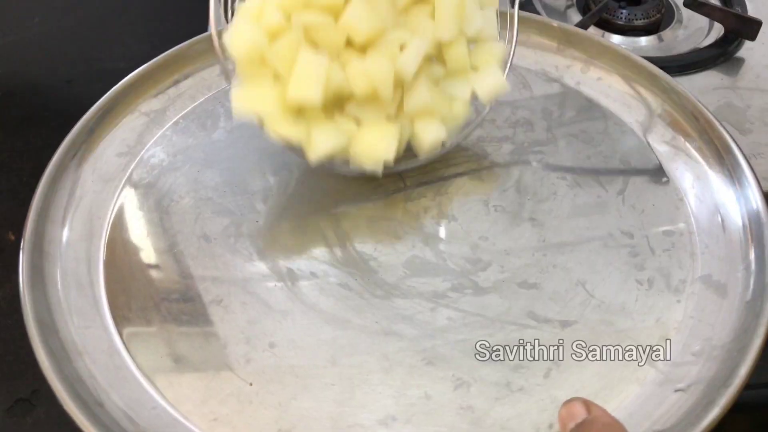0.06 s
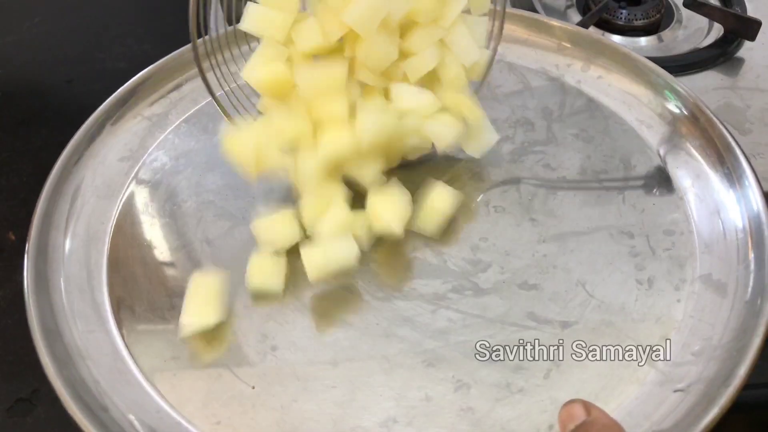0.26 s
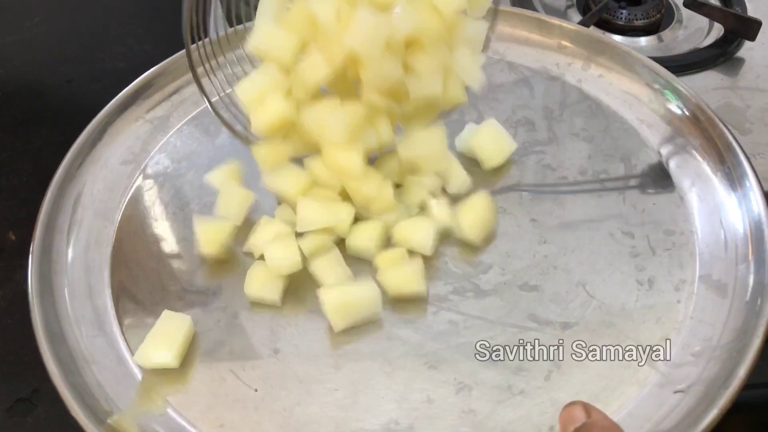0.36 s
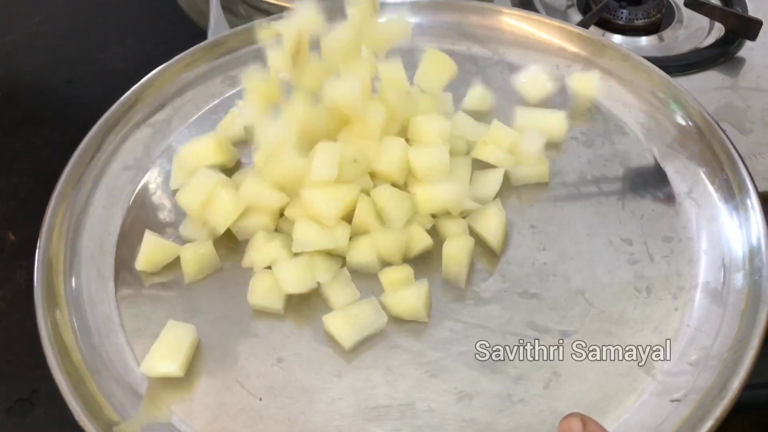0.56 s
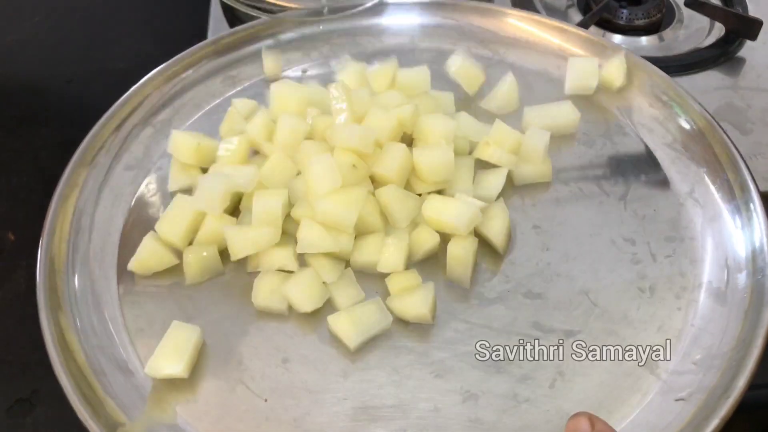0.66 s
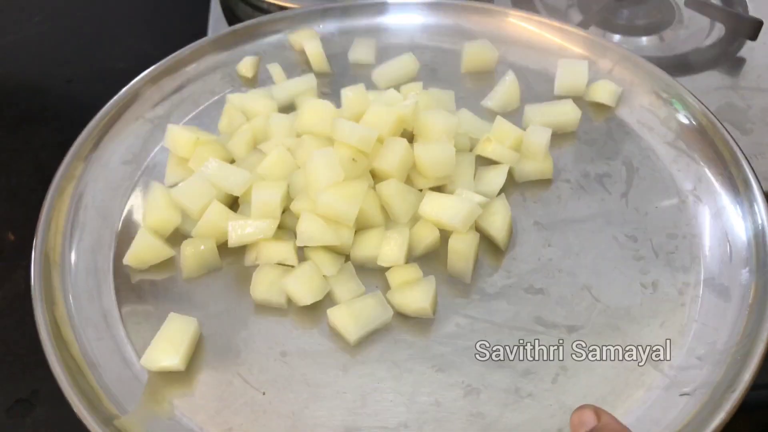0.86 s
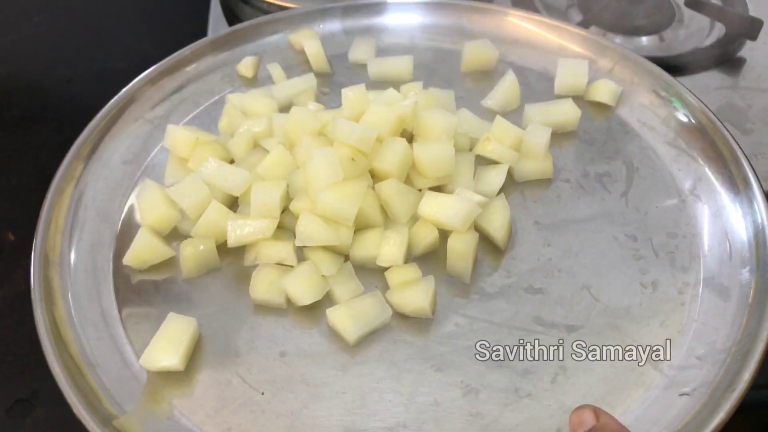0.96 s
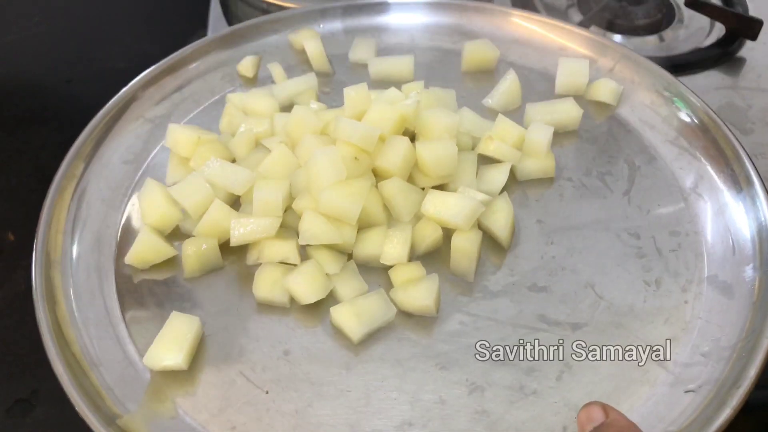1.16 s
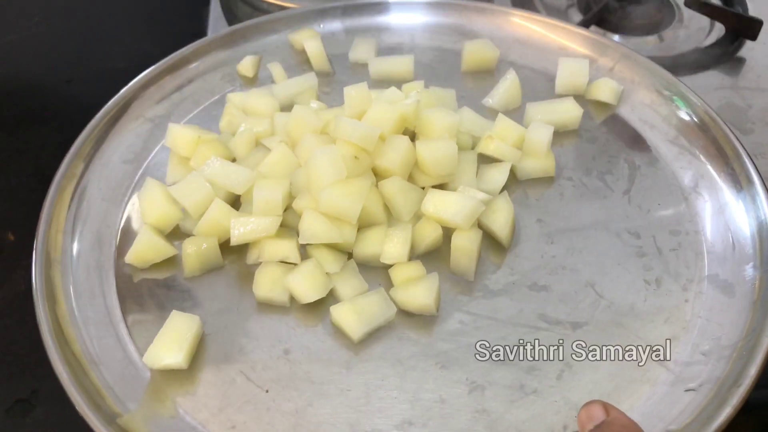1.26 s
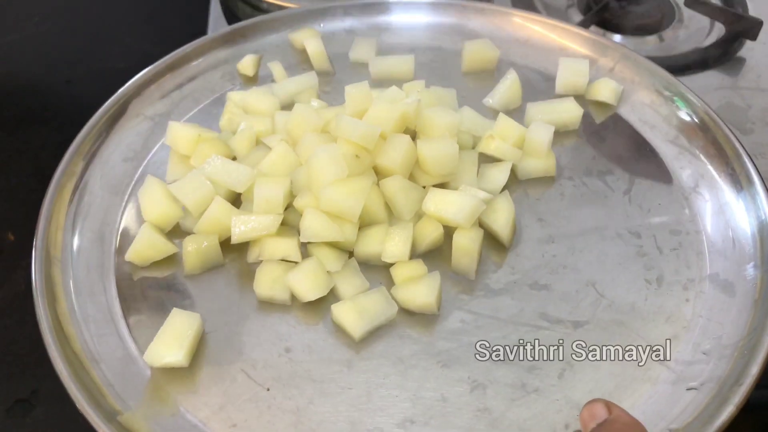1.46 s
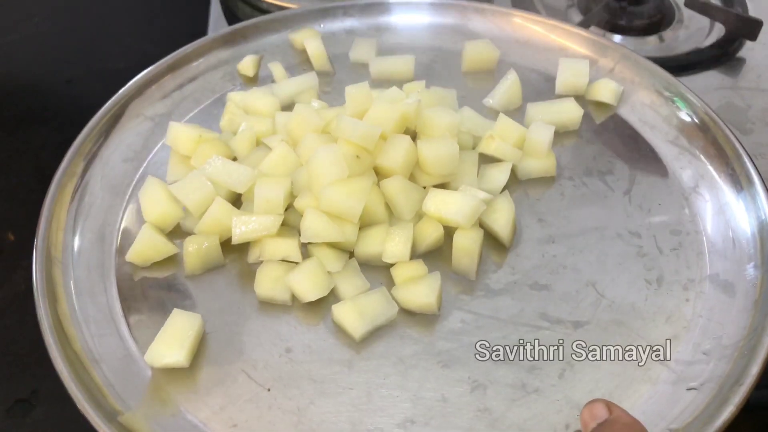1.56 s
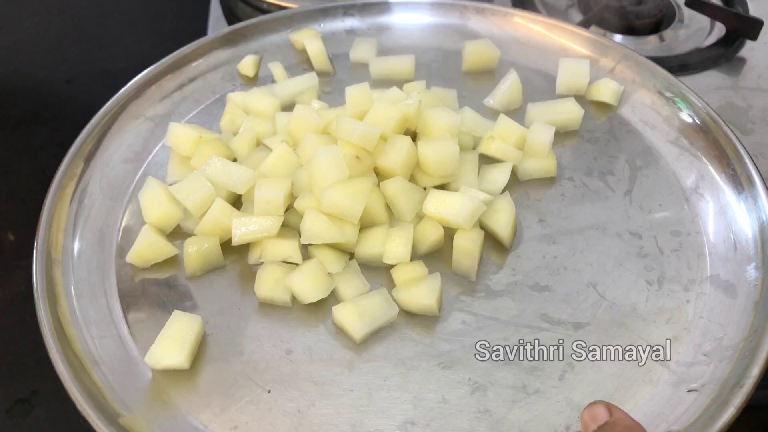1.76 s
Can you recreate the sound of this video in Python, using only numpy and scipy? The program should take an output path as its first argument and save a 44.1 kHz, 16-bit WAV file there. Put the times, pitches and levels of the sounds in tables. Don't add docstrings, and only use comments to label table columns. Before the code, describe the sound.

Close up in a quiet kitchen, soft cubes drum and tumble across a ringing metal plate and thin out, followed by a strainer clinking and dragging on a pot rim, ending in a tiny tick.

```python
import sys
import numpy as np
from scipy import signal
from scipy.fft import rfft, irfft
from scipy.io import wavfile

SR = 44100
rng = np.random.default_rng(int(sys.argv[2]) if len(sys.argv) > 2 else 0)


def materialize(psi):
    bounded = np.clip(np.atleast_2d(psi).T, -1, 1)
    quanta = np.round(bounded * 32767).astype(np.int16)
    wavfile.write(sys.argv[1], SR, quanta)


def volts_from_db(level):
    exponent = np.asarray(level, float) / 20
    return 10 ** exponent


N = 79380
RING = 13230


def shade(table, hz):
    log_hz, db = np.log(np.array(table)[:, 0]), np.array(table)[:, 1]
    return np.interp(np.log(hz), log_hz, db)


def curve(table, edge_s):
    t, rows = np.arange(N) / SR, np.array(table)
    inside_s = np.minimum(t - rows[0, 0], rows[-1, 0] - t)
    return volts_from_db(np.interp(t, rows[:, 0], rows[:, 1])) * np.clip(inside_s / edge_s + 1, 0, 1)


def unit(x):
    return x / np.sqrt(np.mean(x ** 2))


def unit_energy(x):
    return x / np.sqrt(np.sum(x ** 2))


def highpass(x, order, hz):
    return signal.sosfilt(signal.butter(order, hz, "high", fs=SR, output="sos"), x)


def ringing(hz, t60):
    t = np.arange(RING) / SR
    return np.sin(2 * np.pi * hz[:, None] * t) * np.exp(-np.log(1000) * t / t60[:, None])


def steel(clear_hz, clear, crowd, crowd_t60_s, count, valley_db=0):
    clear, chance = np.array(clear), rng.random((count, 3))
    low_hz, high_hz = crowd[0][0], min(crowd[-1][0], 16200)
    crowd_hz = low_hz + (np.arange(count) + chance[:, 0]) / count * (high_hz - low_hz)
    nearest_hz = np.abs(crowd_hz[:, None] - np.array(clear_hz)).min(axis=1)
    apart = np.clip(nearest_hz / 130, 0, 1) * np.clip((5000 - crowd_hz) / 1000, 0, 1)
    crowd_db = shade(crowd, crowd_hz) - 12 + valley_db * apart
    crowd_t60 = crowd_t60_s * 2.5 ** (2 * chance[:, 1] - 1)
    hz = np.r_[clear_hz, crowd_hz]
    rings = ringing(hz, np.r_[clear[:, 1], crowd_t60])
    return hz, np.r_[clear[:, 0], crowd_db], rings, np.arange(len(hz)) >= len(clear)


def struck(body, mix, tilt, spot_hz, spot_db, spot_oct, ring_s, snap=0, clear_db=0):
    hz, db, rings, crowd = body
    t = np.arange(RING) / SR
    spot = spot_db * np.exp(-.5 * (np.log2(hz / spot_hz) / spot_oct) ** 2)
    scatter = 3.5 * mix[0] * (0.72 + 0.76 * crowd)
    gains = volts_from_db(db + tilt * np.log2(hz / 4000) + spot + scatter) * np.sign(mix[1])
    damp = np.log(1000) * t / max(ring_s, .01)
    small = (gains * crowd) @ rings * (1 + snap * np.exp(-t / 0.0087)) * np.exp(-damp)
    clear = (gains * ~crowd) @ rings * np.exp(-damp / 2.5)
    return small + volts_from_db(clear_db) * clear


def clinks(hits, body):
    out = np.zeros(N + 2 * RING)
    mixes = rng.standard_normal((len(hits), 2, len(body[0])))
    chatters = rng.standard_normal((len(hits), 512))
    for (s, peak_db, tilt, hz, ring_s), mix, chatter in zip(hits, mixes, chatters):
        push = 0.0067 * chatter ** 3 * np.exp(-np.arange(512) / SR / 0.0043)
        push[0] += 1
        tone = struck(body, mix, tilt, hz, 5.5, 0.12, ring_s, snap=1, clear_db=-9)
        y = signal.fftconvolve(tone, push)
        y = y / np.sqrt(np.mean(y[:300] ** 2))
        y[16:19] += np.array([-1, 2, -1])
        start = int(s * SR)
        out[start:start + len(y)] += y * volts_from_db(peak_db - 4) / 1.96
    return out[:N]


def grains(per_s, spread_db):
    chance = rng.random((3, N))
    strength = volts_from_db(-spread_db * np.log(chance[1] + 1e-9))
    return (chance[0] < per_s / SR) * strength * np.sign(chance[2] - .5)


def rattle(table, body, per_s, tilt, spot_hz, ring_s, spread_db, clear_db):
    out = 0
    for mix in rng.standard_normal((4, 2, len(body[0]))):
        tone = struck(body, mix, tilt, spot_hz, 3.95, 0.15, ring_s, clear_db=clear_db)
        touches = unit(grains(per_s / 4, spread_db)) * curve(table, 0.0033)
        out = out + signal.fftconvolve(touches, unit_energy(tone))[:N] / 2
    return out


def voices(table, stifled):
    out, rows, t = np.zeros(N + RING), np.array(table), np.arange(RING) / SR
    hz, t60 = rows[:, 1], rows[:, 3]
    rings = ringing(hz, t60)
    for side, chance in zip((-1, 1), rng.random((2, len(table)))):
        twin_hz = hz * (1 + side * 60 / 3000 * (.5 + chance))
        rings = rings + side * volts_from_db(-7) * ringing(twin_hz, t60 / 2)
    for (s, _, db, _), ring in zip(table, rings):
        free_s = min([touch - s for touch in stifled if touch > s + .01] + [1])
        gain = volts_from_db(db - 60 * np.maximum(t - free_s, 0) / 0.063)
        out[int(s * SR):int(s * SR) + RING] += gain * ring * np.clip(t / 0.0021, 0, 1)
    return out[:N]


# frequency in Hz, level in dB.
KITCHEN_TONE = [(12, -36), (25, -5.5), (60, 4), (189, -0.5), (342, 2), (428, -2.5), (479, 1), (2810, -20),
                (15700, -27.5), (16000, -39)]


def kitchen():
    hz = np.maximum(np.arange(N // 2 + 1) * SR / N, 1)
    murmur = irfft(rfft(rng.standard_normal(N)) * volts_from_db(shade(KITCHEN_TONE, hz)), N)
    hum = irfft(rfft(rng.standard_normal(N)) / (1 + ((hz - 246.6) / 12) ** 2), N)
    return unit(murmur) * volts_from_db(-59.5) + unit(hum) * volts_from_db(-67)


def tiled_room(near):
    t, t60_s = np.arange(RING) / SR, 0.25
    tail = rng.standard_normal(RING) * np.exp(-np.log(1000) * t / t60_s) * np.clip(t / 0.0068, 0, 1)
    tail = signal.lfilter(*signal.butter(1, 6500, fs=SR), tail)
    return volts_from_db(-10.5) * signal.fftconvolve(near, unit_energy(tail))[:N]


MESH_MODE_HZ = [2200, 7252, 7450, 11400]
# level in dB, t60 in seconds.
MESH_MODES = [(-14, .05), (-7, .3), (-8, .3), (-13, .3)]
# frequency in Hz, level in dB.
MESH_CROWD = [(3500, -19), (6000, -6), (7300, 1.5), (8500, -8), (13000, -3.5), (15900, -25)]
# start in seconds, peak in dB, tilt in dB per octave,
# loudest ring in Hz, ring in seconds.
MESH_HITS = [
    (1.7418, -35, 1, 7200, 0.57),
]


def mesh():
    return clinks(MESH_HITS, steel(MESH_MODE_HZ, MESH_MODES, MESH_CROWD, 0.071, count=200))


POT_MODE_HZ = [474, 1125, 1877, 2186, 2433, 2783, 2871, 3436, 3608, 4533, 8800]
# level in dB, t60 in seconds.
POT_MODES = [(-1.5, 0.26), (0, 0.14), (1.5, 0.66), (3, 0.12), (-34, 0.2), (-23, 0.22), (-6, 0.69),
             (6, 0.28), (-10, 0.18), (-7, 0.19), (8.5, 0.087)]
# frequency in Hz, level in dB.
POT_CROWD = [(530, -38), (900, -8.5), (1810, 1.5), (2600, -3), (5040, -3), (8550, -6), (14400, -3),
             (15900, -10)]
# start in seconds, peak in dB, tilt in dB per octave, loudest ring in Hz, ring in seconds.
POT_HITS = [(1.2754, -19.5, 2, 1140, 0.16), (1.283, -33, -6, 474, 0.066), (1.331, -37, -8, 6000, .02),
            (1.3442, -34.5, 0.5, 7000, 0.028), (1.3465, -42, 1, 7000, 0.016), (1.3731, -38.5, 0, 12000, .1),
            (1.386, -44, 3, 13000, .06), (1.4116, -24.5, 2, 6900, 0.075), (1.4684, -22.5, 1, 1840, 0.13),
            (1.617, -48, 5, 8100, 0.035), (1.672, -42, -11.5, 5750, 0.059)]
# time in seconds, level in dB.
SCRAPE = [
    (1.278, -54),
    (1.39, -53),
    (1.405, -60.5),
    (1.43, -50.5),
    (1.5, -51.5),
    (1.6, -54.5),
    (1.67, -53),
    (1.69, -65.5),
    (1.73, -65),
    (1.8, -61.5),
]
# start in seconds, frequency in Hz, level in dB, t60 in seconds.
POT_VOICES = [(1.2754, 1125, -36, 0.12), (1.2754, 2840, -50, 0.28), (1.2754, 3440, -34, 0.051),
              (1.2754, 6000, -35, 0.055), (1.2754, 8780, -37.5, 0.11), (1.2754, 12760, -44, 0.09),
              (1.4116, 3440, -53.5, 0.047), (1.4116, 6977, -50, 0.048), (1.4116, 8242, -40.5, 0.061),
              (1.4684, 1879, -42, 0.22), (1.473, 2186, -46, 0.08), (1.4684, 4300, -39.5, 0.034),
              (1.4684, 8845, -46, .2), (1.7418, 2200, -55, 0.037)]
POT_STIFLED = [1.5, 1.7, 1.52]


def pot():
    body = steel(POT_MODE_HZ, POT_MODES, POT_CROWD, 0.07, count=420, valley_db=-4)
    scrape = rattle(SCRAPE, body, per_s=2100, tilt=0.37, spot_hz=8000, ring_s=0.0087, spread_db=1.0, clear_db=-15)
    return clinks(POT_HITS, body) + scrape + voices(POT_VOICES, POT_STIFLED)


PLATE_MODE_HZ = [948, 1226, 1308, 1649, 1697, 2036, 2567, 2944, 3582, 4544, 6050]
# level in dB, t60 in seconds.
PLATE_MODES = [(4, 0.081), (21.5, 0.11), (-12, 0.15), (6, 0.2), (-6, 0.21), (1, 0.77), (-9, 0.48),
               (5, 0.41), (2, 0.52), (4, 0.23), (2, 0.12)]
# frequency in Hz, level in dB.
PLATE_CROWD = [(410, -48), (700, 7), (2020, 2), (3240, -1), (4380, -5.5), (9000, -8), (12000, -7.5),
               (15900, -14)]
# start in seconds, peak in dB, tilt in dB per octave, loudest ring in Hz, ring in seconds.
PLATE_HITS = [(.2028, -22.5, 2.5, 2040, 0.078), (.2517, -28.5, 1, 3582, 0.45), (.276, -31.5, 0, 1630, 0.14),
              (.324, -31.5, -0.5, 12500, 0.11), (.3388, -23, 1.4, 6500, 0.15),
              (.355, -26.5, -0.5, 2150, 0.076), (.5395, -38, -5, 1560, 0.039),
              (.5665, -37.5, -2.5, 3730, 0.025), (.6543, -44, -0.5, 3420, 0.018),
              (.6852, -43, -2.5, 5800, 0.059), (.7391, -38, -1, 3950, 0.02), (.8014, -49, 5, 8800, 0.028),
              (.8633, -45, 3, 3230, 0.11), (1.1477, -61, 1, 2350, 0.041)]
# time in seconds, level in dB.
POUR = [
    (.205, -47),
    (.245, -54.5),
    (.26, -43),
    (.29, -47),
    (.32, -45.5),
    (.36, -50.5),
    (.43, -59.5),
    (.58, -63),
    (.62, -93),
]
# start in seconds, frequency in Hz, level in dB, t60 in seconds.
PLATE_VOICES = [(.2028, 953, -44.5, 0.18), (.2028, 1314, -35, 0.12), (.2028, 2040, -43, .5),
                (.2028, 3020, -46, .1), (.2028, 4544, -41.5, 0.17), (.2028, 7251, -45, 0.09),
                (.2028, 11270, -34, 0.074), (.2028, 12180, -43, .09), (.2028, 15470, -42, .1),
                (.2517, 1061, -46.5, 0.4), (.2517, 2562, -53, 0.33), (.2517, 4231, -43.5, 0.19),
                (.2517, 5986, -52, 0.55), (.2517, 7418, -51, .14), (.2517, 11980, -41, 0.21),
                (.2517, 14220, -48, .11), (.2517, 15390, -49, 0.33), (.264, 3585, -45, .6),
                (.272, 1690, -41.5, 0.38), (.3388, 1217, -46, 0.049), (.3388, 2051, -36, 0.096),
                (.3388, 2945, -44, 0.22), (.3388, 3451, -47, 0.31), (.3388, 4084, -40.5, .1),
                (.3388, 6100, -41, .08), (.3388, 11790, -43, 0.11), (.357, 1200, -29, 0.045)]
PLATE_STIFLED = [0.26, .337, 0.38]


def plate():
    body = steel(PLATE_MODE_HZ, PLATE_MODES, PLATE_CROWD, 0.94, count=420, valley_db=-4)
    pour = rattle(POUR, body, per_s=900, tilt=1.7, spot_hz=3582, ring_s=0.11, spread_db=4.0, clear_db=-11.5)
    return clinks(PLATE_HITS, body) + pour + voices(PLATE_VOICES, PLATE_STIFLED)


LOADED_MODE_HZ = [183, 240, 269, 324, 448, 580, 642]
# level in dB, t60 in seconds.
LOADED_MODES = [(3.5, 0.039), (-3, 0.48), (-2.5, 0.11), (0, 0.053), (0, 0.069), (-16, 0.018), (1.5, 0.024)]
# frequency in Hz, level in dB.
LOADED_CROWD = [(94, -29), (160, -2), (1190, 0.5), (1820, -19), (2000, -32), (2600, -57), (4400, -120)]
# start in seconds, peak in dB, loudest ring in Hz.
CUBES = [(.003, -41, 245), (.2517, -17.5, 574), (.304, -28, 300), (.324, -24, 323), (0.315, -34.5, 503),
         (0.261, -29, 445), (.283, -26.5, 450), (.42, -27.5, 607), (.578, -34, 1170), (0.597, -35, 277),
         (0.621, -37, 334), (.201, -31.5, 260), (.355, -24.5, 650), (0.38, -24.5, 520), (.392, -27, 366),
         (.444, -32.5, 344), (.4735, -29, 610), (.493, -27, 1290), (0.506, -22, 535), (.528, -25, 300),
         (0.547, -24, 340), (.559, -24, 790), (.568, -27.5, 750), (.648, -30.5, 620), (.709, -28.5, 650),
         (.739, -30.5, 910), (0.804, -35, 460), (0.837, -37.5, 497), (0.896, -31, 860), (.916, -35, 740),
         (1.055, -38.5, 615), (1.422, -32, 344), (1.474, -38, 520)]
# time in seconds, level in dB.
TUMBLE = [
    (0, -63),
    (.06, -81.5),
    (.24, -45.5),
    (.26, -40.5),
    (.4, -43.5),
    (.57, -49),
    (.62, -50.5),
    (1.0, -61.5),
    (1.3, -69),
]
# time in seconds, level in dB.
SHIFT = [
    (1.28, -66),
    (1.39, -65),
    (1.42, -46),
    (1.49, -54.5),
    (1.55, -60.5),
    (1.62, -56),
    (1.66, -49),
    (1.72, -67),
    (1.8, -63.5),
]


def potatoes():
    loaded = steel(LOADED_MODE_HZ, LOADED_MODES, LOADED_CROWD, 0.088, count=40)
    soft_push = np.hanning(18)
    thuds = np.zeros(N + RING)
    mixes = rng.standard_normal((len(CUBES), 2, len(loaded[0])))
    for (s, peak_db, hz), mix in zip(CUBES, mixes):
        tone = struck(loaded, mix, 3.64, hz, spot_db=9.5, spot_oct=0.23, ring_s=0.028)
        y = signal.fftconvolve(tone, soft_push)[:RING]
        thuds[int(s * SR):int(s * SR) + RING] += y * volts_from_db(peak_db - 4.5) / np.abs(y).max()
    roll = rattle(TUMBLE, loaded, per_s=240, tilt=0.14, spot_hz=300, ring_s=0.22, spread_db=3.0, clear_db=-1)
    shift = rattle(SHIFT, loaded, per_s=240, tilt=3.1, spot_hz=650, ring_s=0.038, spread_db=2.0, clear_db=-3.5)
    rolling = signal.fftconvolve(roll + shift, soft_push / 8.4)[:N]
    return highpass(thuds[:N] + rolling, 4, 166)


def scene():
    near = highpass(plate() + pot() + mesh(), 2, 400) + potatoes()
    return (near + tiled_room(near) + kitchen())[None]


def top_cut(x):
    return signal.sosfilt(signal.butter(12, 16970, fs=SR, output="sos"), x)


def record(dry):
    port_hz, port_width_hz = 10500, 1000
    dip = signal.lfilter(*signal.iirpeak(port_hz, port_hz / port_width_hz, fs=SR), dry)
    top = signal.butter(10, 16300, fs=SR, output="sos")
    heard = signal.sosfilt(top, dry - 0.42 * dip)
    return top_cut(heard)


dry = scene()
out = record(dry)
materialize(out)
```